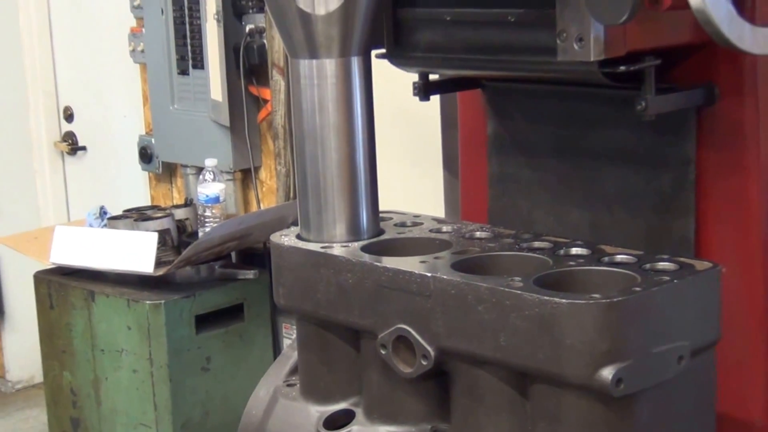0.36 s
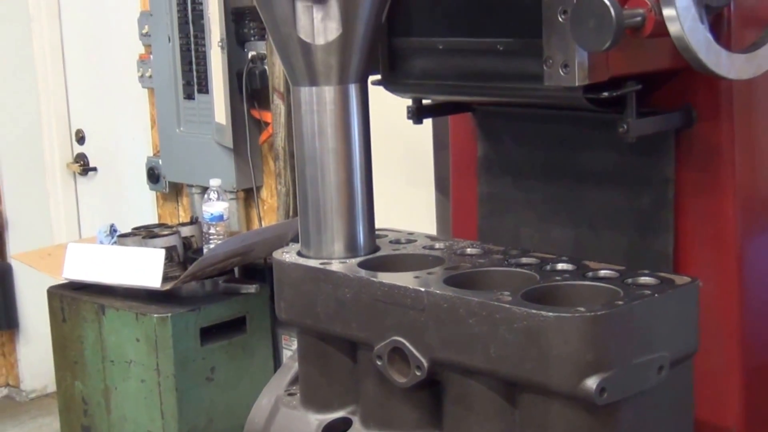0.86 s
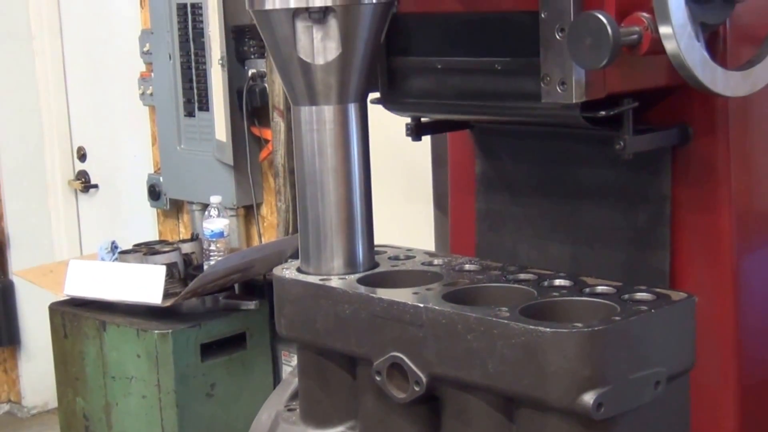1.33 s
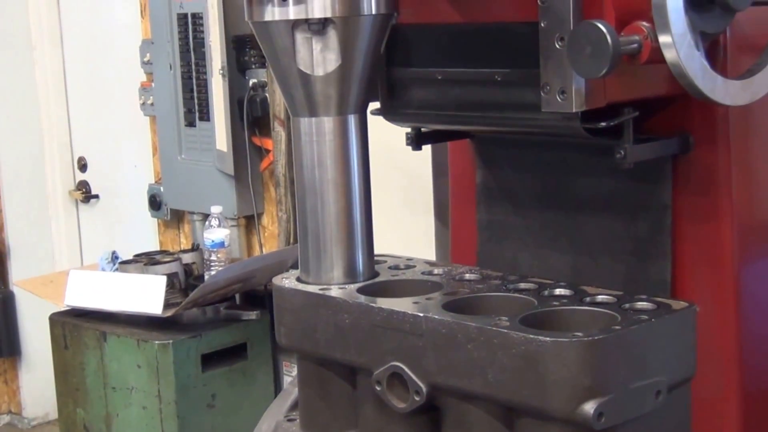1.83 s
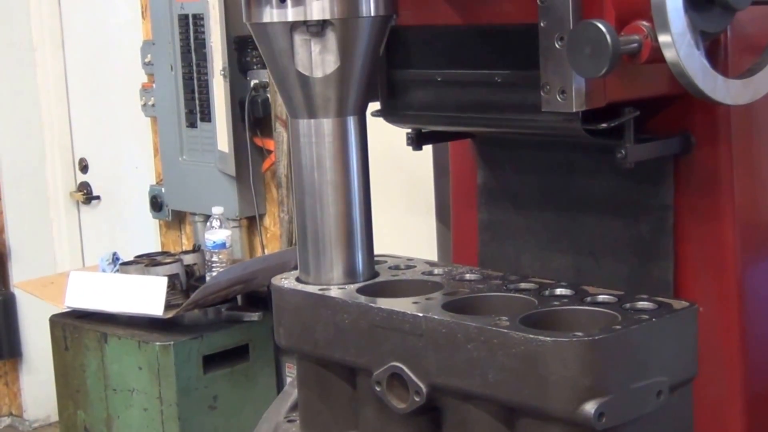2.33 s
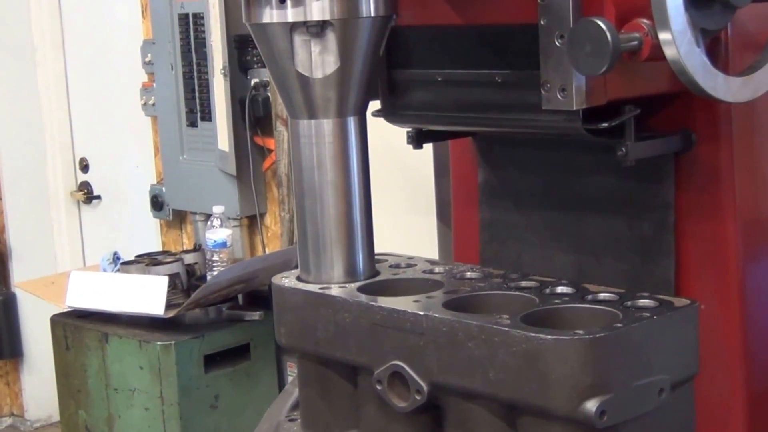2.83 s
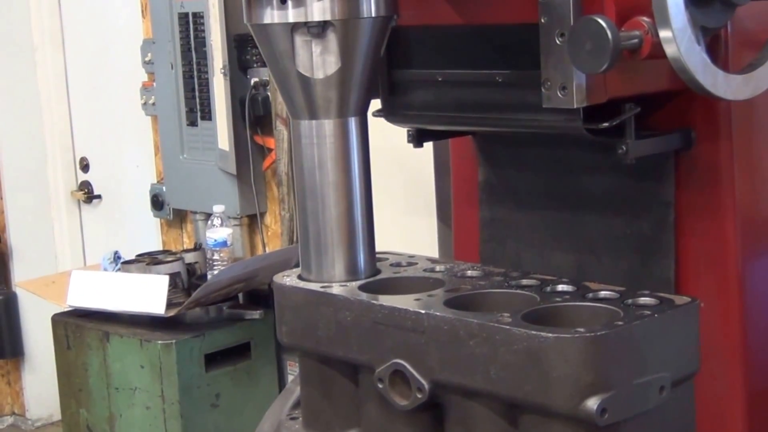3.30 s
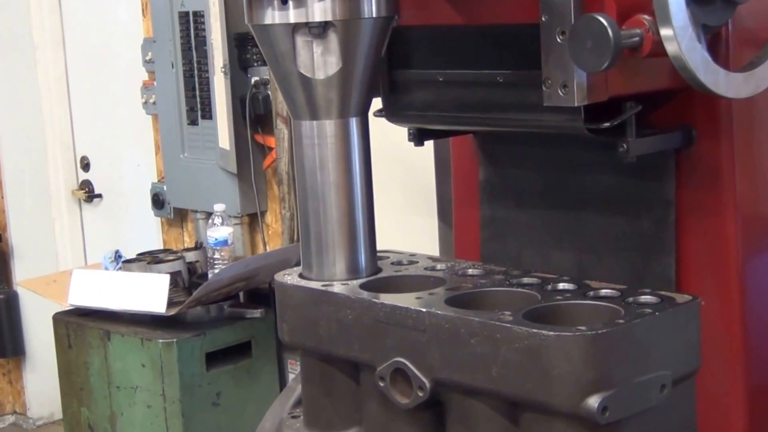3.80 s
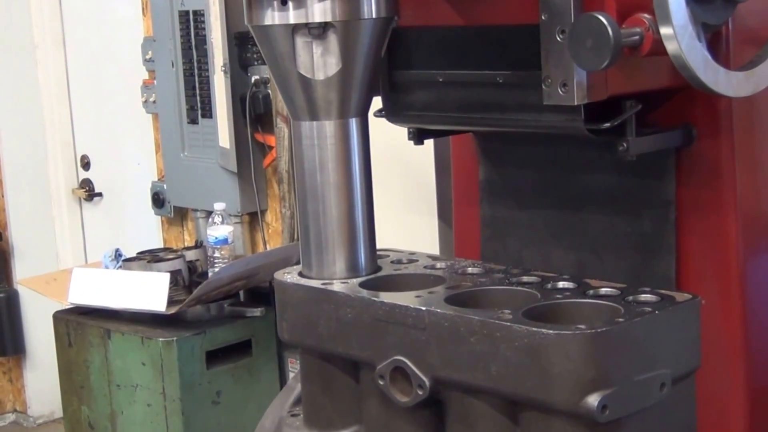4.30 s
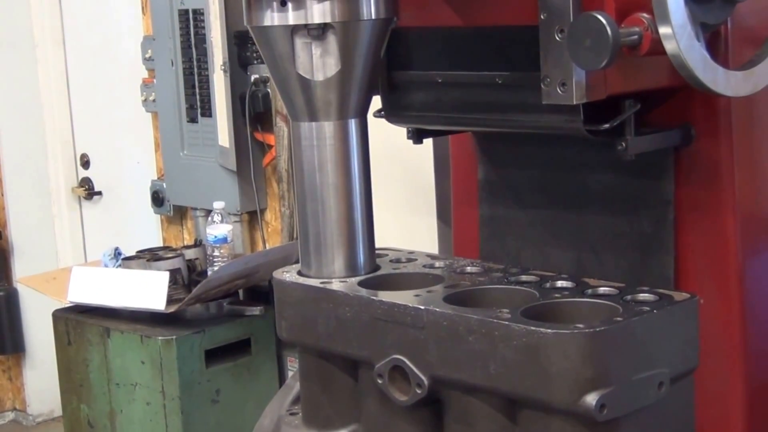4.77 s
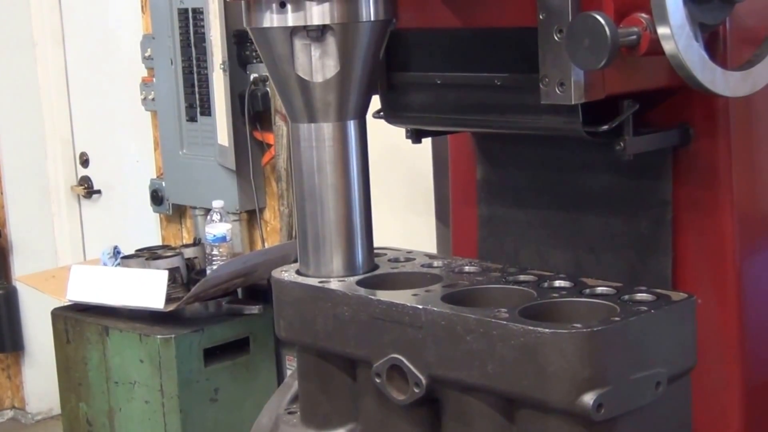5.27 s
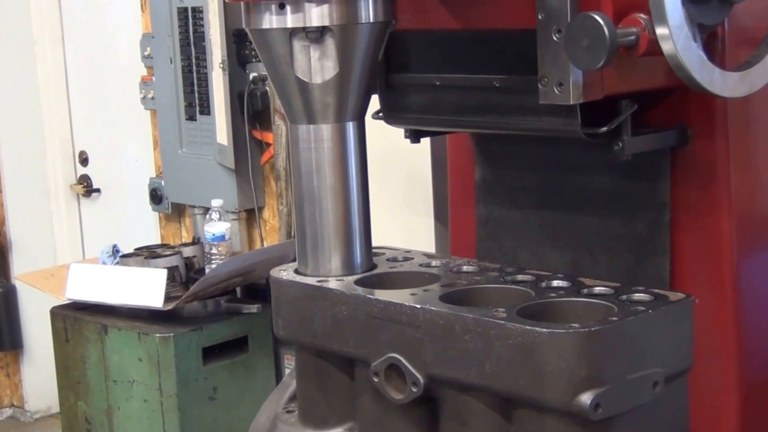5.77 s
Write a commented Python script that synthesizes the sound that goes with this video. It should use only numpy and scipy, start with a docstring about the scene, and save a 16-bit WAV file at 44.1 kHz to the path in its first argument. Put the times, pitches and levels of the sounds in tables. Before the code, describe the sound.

From 0 seconds a boring machine is already cutting inside an iron engine block in a workshop, and it continues unbroken to about 6 seconds. The loudest layer is a steady, bright, slightly metallic hiss with a fine airy fizz on top, nearly constant in level. Under it a grainy rasp rings through the iron with many narrow resonances, fluttering about eighteen times a second. A dull low drone, electrical hum, pump pulse, mid gear whine and thin high whines hold almost fixed pitches. A small dry click lands near 0.7 seconds; around 2.4 seconds a very faint tick is followed at once by a stronger, lower knock. Rasp, drone and tones wander slightly and rise gradually by about four decibels, so the ending is fuller. The stereo pickup is close, lower sounds leaning left, the hiss more central, deep bass thin.

```python
"""From the start a boring bar cuts down a cylinder of an iron engine block in a machine shop: filtered noise
rasps through the sharp modes of the block, the casing drones and the head hisses, all partly repeating each
turn of the drive shaft. Sine tones give the mains hum, the pump pulse and gear whine at tooth orders of three
shafts. Small clicks near the block, sums of decaying modes, fall once early and twice close together later.
Drone, rasp and tones grow steadily louder as the bar goes deeper."""
import sys
import numpy as np
from scipy import signal
from scipy.fft import rfft, irfft, next_fast_len
from scipy.io import wavfile
from scipy.ndimage import uniform_filter1d, map_coordinates

SR = 44100
rng = np.random.default_rng(int(sys.argv[2]) if len(sys.argv) > 2 else 0)


def wav_out(sig):
    """Save sig, one row per channel (or a flat mono array), as 16-bit PCM at SR to the path in sys.argv[1]."""
    wavfile.write(sys.argv[1], SR, np.round(np.clip(np.atleast_2d(sig).T, -1, 1) * 32767).astype(np.int16))


def field_ratio(decibels):
    """Amplitude ratio for a level in dB (20 dB per decade); scalars and array-likes work."""
    return 10 ** (np.asarray(decibels, dtype=float) / 20)


N = 270333

# rates of three shafts, a pump pulse and the mains: (rate [Hz])
SPEEDS = [18.499, 14.801, 45.702, 278.2, 60.1]
DRIVE_HZ, IDLER_HZ, MOTOR_HZ, PUMP_HZ, MAINS_HZ = SPEEDS
MESH_HZ = 64 * DRIVE_HZ  # 64 teeth meet per turn


def unit(x):
    """Normalization by effective value: scale to rms 1."""
    return x / np.sqrt(np.mean(x ** 2) + 1e-20)


def along(points, hz):
    """Interpolation on a logarithmic frequency axis through (frequency [Hz], value) points."""
    f, v = np.transpose(points)
    return np.interp(np.log(hz + 1), np.log(f + 1), v)


def wobble(rate):
    """Slow random modulation: a smooth curve through normal random knots, rate knots a second."""
    coarse = np.arange(0, N + 64, 64)
    knots = rng.standard_normal(int(N * rate / SR) + 4)
    return np.interp(np.arange(N), coarse, map_coordinates(knots, [coarse * rate / SR]))


def patchy_noise(patchy_db):
    """Nonstationary noise: two independent channels share random patches of level in time and frequency."""
    z = signal.stft(rng.standard_normal((2, N + SR)), nperseg=512)[2]
    field = rng.standard_normal(z.shape[1:])
    field = uniform_filter1d(uniform_filter1d(field, size=6, axis=0), size=10, axis=1)
    return signal.istft(z * field_ratio(patchy_db * unit(field)), nperseg=512)[1]


def turn_comb(hz):
    """Comb filtering by delayed feedback: each turn of the drive shaft feeds the next."""
    # share of the vibration that comes round again after one turn: (frequency [Hz], share [0-1])
    repeat = [(600, 0.2), (1400, 0.36), (3000, 0.36), (5500, 0.25), (8000, 0.43), (12000, 0)]
    again = np.clip(along(repeat, hz), 0, .9)
    return np.sqrt(1 - again ** 2) / (1 - again * np.exp(-2j * np.pi * hz / DRIVE_HZ))


def stereo_field(a, b, hz):
    """Interchannel coherence: mixing independent spectra sets likeness; level and phase offsets set the image."""
    # left-right likeness: (frequency [Hz], correlation, clipped to -1..1)
    alike = [(60, -1.02), (110, -0.052), (200, 0.79), (360, 0.86), (660, 0.77), (1210, 0.85), (2210, 0.81),
             (4020, 0.84), (7340, 1), (13400, 0.98)]
    # level of left over right: (frequency [Hz], level difference [dB])
    left_over_right = [(60, 2.0), (91, 6.0), (140, 9.5), (210, 10.0), (320, 9.5), (480, 4.5), (730, 7.5),
                       (1100, 5.5), (1670, 8.0), (2530, 11.0), (3840, -2.0), (5820, -1.0), (8830, 0.0),
                       (13400, 0.0)]
    # phase by which the left leads: (frequency [Hz], phase [rad])
    lead = [(0, 0.52), (4480, -0.11), (6120, -0.66), (9130, -0.56), (9990, 0.32), (11100, 0.61),
            (13500, 0.23)]
    angle = np.arccos(np.clip(along(alike, hz), -1, 1)) / 2
    tilt = field_ratio(along(left_over_right, hz) / 2) * np.exp(.5j * along(lead, hz))
    left = tilt * (a * np.cos(angle) + b * np.sin(angle))
    right = (a * np.cos(angle) - b * np.sin(angle)) / tilt
    return np.array([left, right]) / ((abs(tilt) + 1 / abs(tilt)) / 2)


def ringing(spectrum, centres, modes, patchy_db):
    """Modal response to random excitation: broad colour plus Lorentzian peaks, in stereo with mid rms 1."""
    pair = patchy_noise(patchy_db)
    m = next_fast_len(pair.shape[1])
    hz = np.fft.rfftfreq(m, 1 / SR)
    peaks = sum(field_ratio(2 * db) / (1 + (2 * (hz - c) / width) ** 2) for c, (width, db) in zip(centres, modes))
    colour = field_ratio(along(spectrum, hz)) * np.sqrt(1 + peaks)  # powers add
    a, b = rfft(pair, m) * colour * turn_comb(hz)
    ports = irfft(stereo_field(a, b, hz), m)[:, SR // 2:][:, :N]
    return ports / np.sqrt(np.mean(ports.mean(axis=0) ** 2))


def clicks():
    """Impulse response: each hard tap excites the short modes near its centre, neighbours in opposite sense."""
    # taps: (time [s], peak of the direct ring before port gain [dB], centre [Hz], spread [octaves])
    taps = [(0.6675, -10, 2360, 0.38), (2.3735, -22, 2730, 0.51), (2.4006, -5.5, 1900, 0.77)]
    # modes before weighting by distance from the centre: (frequency [Hz], level [dB], 60 dB decay time [s])
    click_modes = [(600, 9, .04), (816, 17.5, 0.037), (940, 9, 0.034), (1550, 14.5, 0.012),
                   (2030, 9, 0.018), (2390, 8, .02), (2820, 6, 0.024), (3340, 1, 0.033)]
    out, t = np.zeros(N + SR), np.arange(SR // 10) / SR
    for start_s, peak_db, centre_hz, spread in taps:
        ring = np.zeros(len(t))
        for k, (hz, level, t60) in enumerate(click_modes):
            off_centre_db = 3.9 * (np.log2(hz / centre_hz) / spread) ** 2
            decay = field_ratio(level - off_centre_db - 60 * t / t60 + rng.normal(0, 1.5))
            ring += (-1) ** k * decay * np.sin(2 * np.pi * hz * t)
        ring *= 1 - np.exp(-t / .0003)  # soft onset
        echo = np.pad(ring, (520, 0))[:len(t)]  # the bench answers
        out[round(start_s * SR):][:len(t)] += field_ratio(peak_db) * (ring + 0.19 * echo) / abs(ring).max()
    return out[:N] * field_ratio(np.array([[2.5], [-3.5]]))  # left and right


def gears(load_db):
    """Line spectrum of periodic forces: tooth, pump and mains tones, slightly unsteady, grow with the load."""
    # mains hum, pump pulse, tooth orders and their sidebands: (frequency [Hz])
    tone_hz = [2 * MAINS_HZ, 10 * IDLER_HZ, PUMP_HZ, 2 * PUMP_HZ, 12 * MOTOR_HZ, MESH_HZ - MOTOR_HZ,
               MESH_HZ, MESH_HZ + MOTOR_HZ, 2 * MESH_HZ, 4 * MESH_HZ - MOTOR_HZ, 4 * MESH_HZ, 384 *
               IDLER_HZ, 384 * IDLER_HZ + 12 * MOTOR_HZ]
    # each tone: (mid rms halfway down the cut [dB], left over right [dB], pitch unsteadiness [Hz])
    tone_levels = [(-61.5, 10, .1), (-61.5, 14, 0.12), (-48, 12, 0.25), (-48, 0, 0.22), (-38, 3, 0.044),
                   (-54.5, 17, 0.16), (-51, -3, 0.076), (-73, -10, 0.23), (-50, 48, 0.35), (-65, -5, 0.2),
                   (-42.5, -9.5, 0.71), (-43.5, 2, 0.85), (-42.5, 3, 0.77)]
    out = np.zeros((2, N))
    for hz, (db, pan_db, drift_hz) in zip(tone_hz, tone_levels):
        phase = 2 * np.pi * (rng.random() + np.cumsum(hz + drift_hz * wobble(2.51)) / SR)
        strength = np.sqrt(2) * field_ratio(db + load_db + 0.88 * wobble(3.42))
        ports = field_ratio(np.array([[pan_db], [-pan_db]]) / 2)
        out += strength * np.sin(phase) * ports / ports.mean()
    return out


def drone(t, swell, surge, throb):
    """Forced vibration of the casing: noise through its low resonances grows with depth."""
    # broad colour: (frequency [Hz], relative level [dB per Hz])
    drone_colour = [(20, -40), (45, -14), (81, -25.5), (152, -9.5), (195, -13), (273, -6.5), (313, -10.5),
                    (396, -11.5), (468, -10), (520, -8.5), (560, -4.5), (776, -7), (1250, -12.5),
                    (1400, -63.5), (1800, -72)]
    # resonances of the casing: (centre [Hz])
    casing_hz = [228, 272, 473, 594, 658, 728]
    # the same resonances: (width [Hz], level over the drone [dB])
    casing = [(10.9, 3), (43, -1), (30.6, 7), (28, 8.5), (16.8, 8), (22, -4)]
    level_db = -36 + 0.6858 * t + 0.46 * swell + surge + 0.9 * throb
    return field_ratio(level_db) * ringing(drone_colour, casing_hz, casing, patchy_db=1.28)


def fizz(throb):
    """Band-limited noise: the top of the hiss, without resonances."""
    # broad colour: (frequency [Hz], relative level [dB per Hz])
    fizz_colour = [(5880, -30), (10000, -3.5), (11000, 4.5), (11400, 3.5), (12000, -7.5), (13100, -8.5),
                   (13600, -49)]
    level_db = -29 + 0.3 * throb + 0.16 * wobble(21)
    return field_ratio(level_db) * ringing(fizz_colour, [], [], patchy_db=1.63)


def hiss(throb):
    """Resonant filtering of noise by the head: high modes colour a hiss of flickering level."""
    # broad colour: (frequency [Hz], relative level [dB per Hz])
    hiss_colour = [(2120, -37), (3600, -20.5), (4220, -16.5), (4650, -6), (4940, -10), (5220, -3.5),
                   (5640, -3), (6250, -3), (6810, -1.5), (7380, -1), (8180, 2.5), (10000, -8.5),
                   (13000, -35), (22000, -120)]
    # resonances of the head: (centre [Hz])
    head_hz = [3828, 3944, 4218, 4770, 5179, 5383, 6065, 6475, 7104, 7177, 7342, 7658, 7915, 8691, 9418]
    # the same resonances: (width [Hz], level over the hiss [dB])
    head = [(24, 1), (41.3, 10.5), (52, 10.5), (133, 2), (48.4, 5.5), (25, 2), (66, 7), (31, 7.5), (6, 8),
            (116, 5), (49, 8), (58, 4), (83.5, 4), (42, 5), (36, 9)]
    level_db = -22.5 + .1 * throb + 0.11 * wobble(24.97)
    return field_ratio(level_db) * ringing(hiss_colour, head_hz, head, patchy_db=1.34)


def rasp(t, swell, surge, throb):
    """Modal excitation by the cut: noise rings the sharp modes of the block, louder with depth."""
    # broad colour: (frequency [Hz], relative level [dB per Hz])
    rasp_colour = [(740, -17), (1250, -20), (1340, -5), (1690, 0.5), (1780, -5), (1900, 0), (2610, -6.5),
                   (2850, -0.5), (3410, -12.5), (4000, -13.5), (5200, -43), (8800, -120)]
    # modes of the block: (centre [Hz])
    block_hz = [1684, 1867, 1948, 2164, 2239, 2314, 2496, 2554, 2736, 2832, 2942, 3048, 3221, 3255, 3569]
    # the same modes: (width [Hz], level over the rasp [dB])
    block = [(15.5, 11.5), (12, 10.5), (11, 7.5), (12, 12.5), (12, 7), (13, 8.5), (13, 11), (10, 11),
             (13, 10), (13, 4), (13.1, 7), (23, 3), (11, 7), (10, 9.5), (15, 14.5)]
    level_db = -34 + 0.73 * t + 0.44 * swell + 0.29 * surge + 0.62 * throb
    return field_ratio(level_db) * ringing(rasp_colour, block_hz, block, patchy_db=1.47)


def scene():
    """Superposition: drone and rasp share load and surge; the shaft's throb modulates every noise layer."""
    t = np.arange(N) / SR
    surge = .6 * wobble(8)
    swell = wobble(1.66)  # the load wanders slowly
    throb = np.sin(2 * np.pi * DRIVE_HZ * t)
    tones = gears(0.7 * (t - t.mean()))  # 0.7 dB per s
    background = clicks() + tones + drone(t, swell, surge, throb)
    return background + fizz(throb) + hiss(throb) + rasp(t, swell, surge, throb)


def band_limit(x):
    """A steep low-pass at the top of the band."""
    return signal.sosfilt(signal.butter(12, 13980, fs=SR, output="sos"), x)


def record(dry):
    """High-pass response: the microphones lose the deep bass, below 50 Hz."""
    low_cut = signal.butter(2, 50, "high", fs=SR, output="sos")
    mix = signal.sosfilt(low_cut, dry)
    return band_limit(mix)


dry = scene()
out = record(dry)
wav_out(out)
```